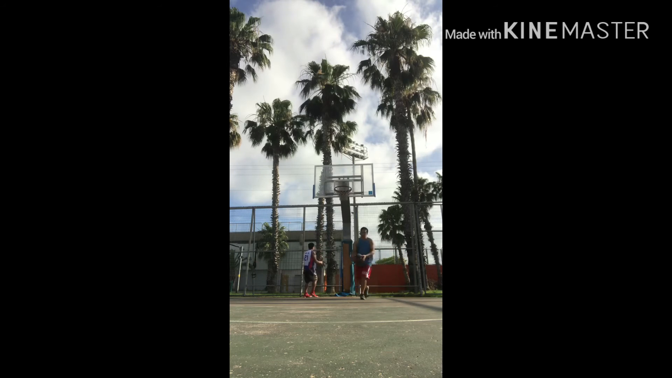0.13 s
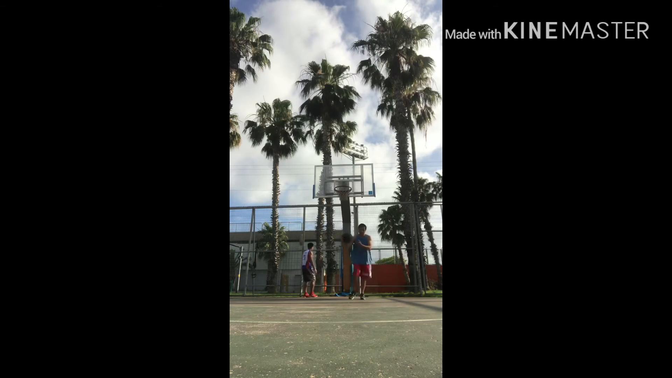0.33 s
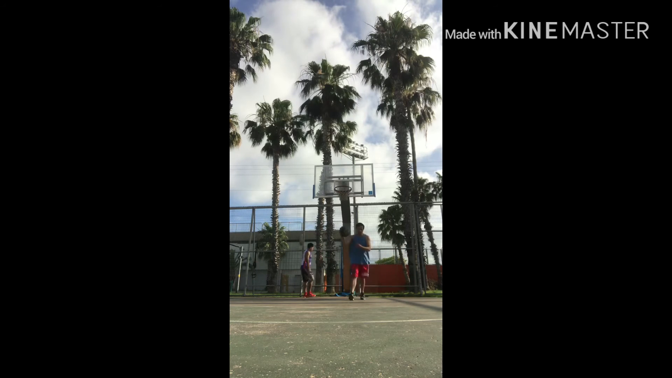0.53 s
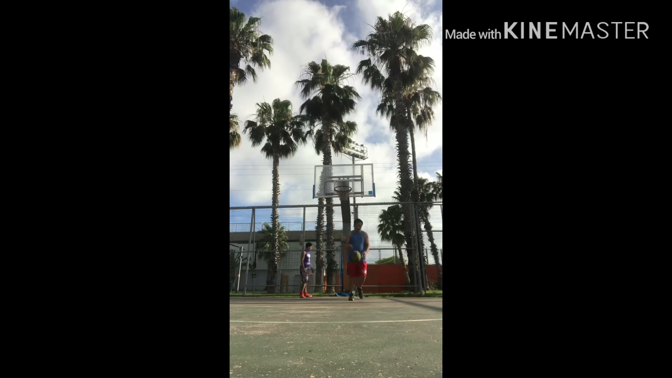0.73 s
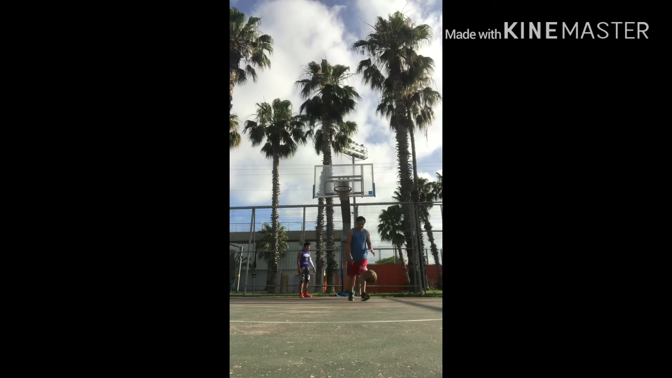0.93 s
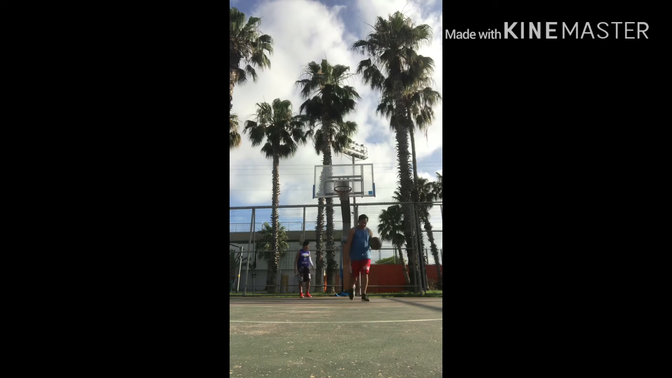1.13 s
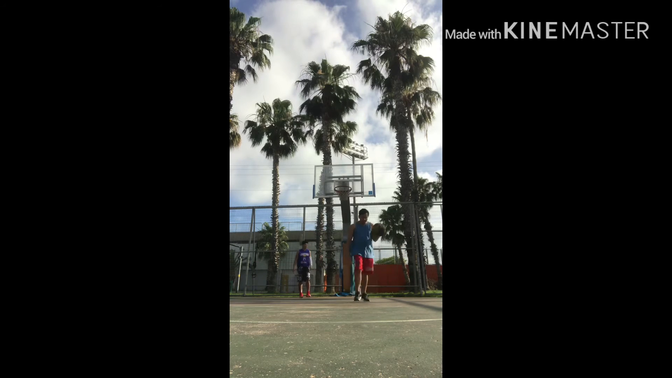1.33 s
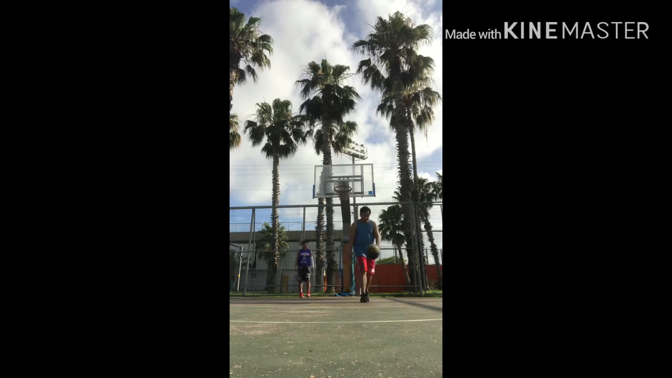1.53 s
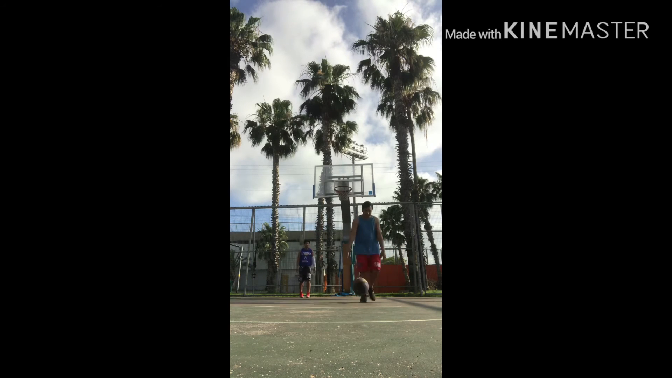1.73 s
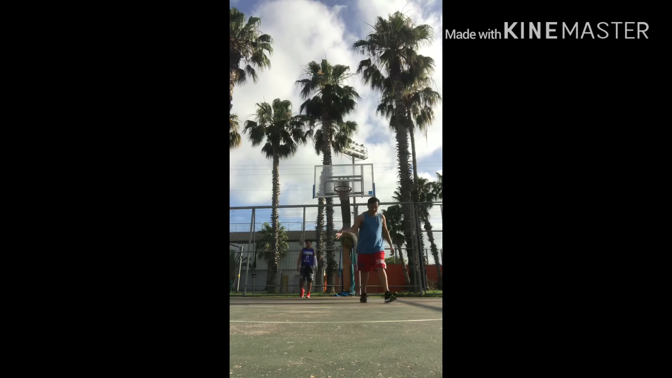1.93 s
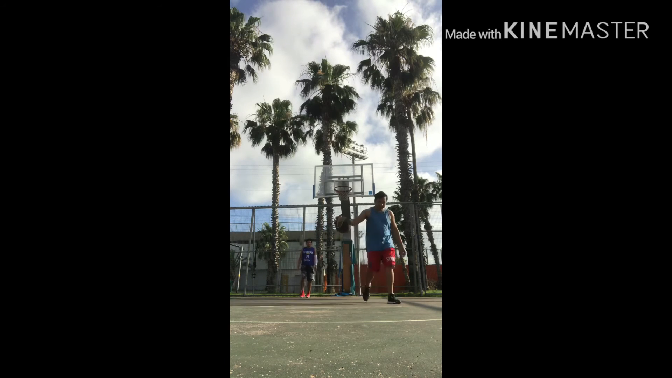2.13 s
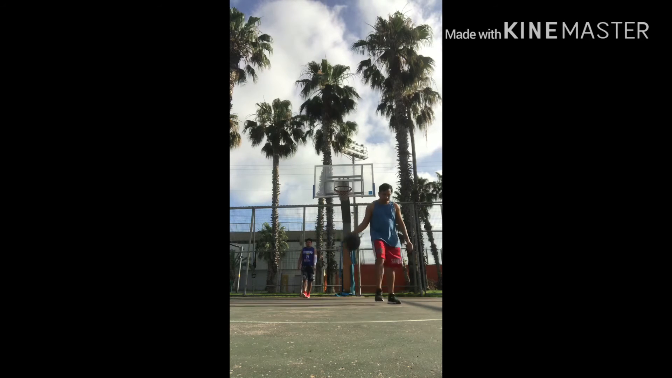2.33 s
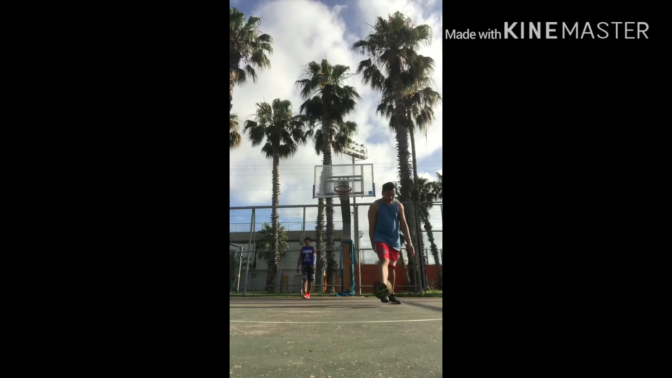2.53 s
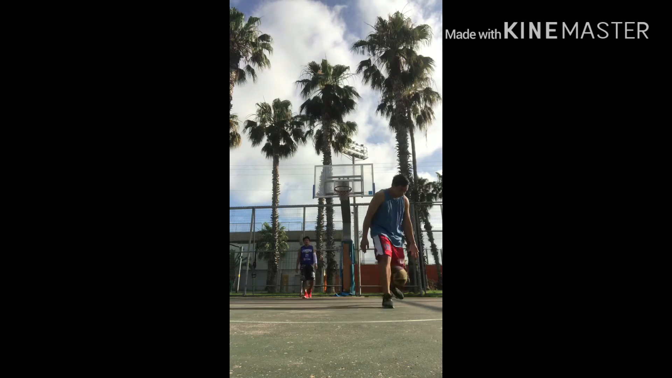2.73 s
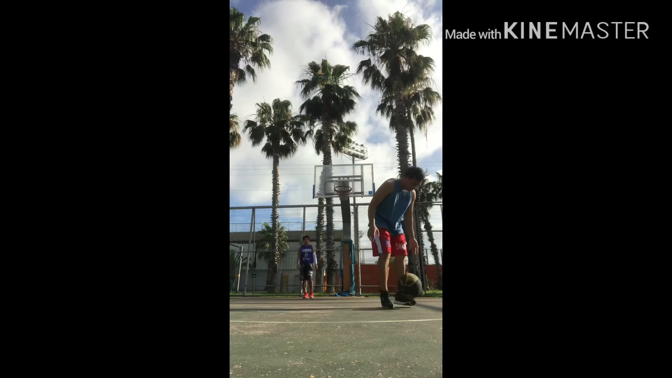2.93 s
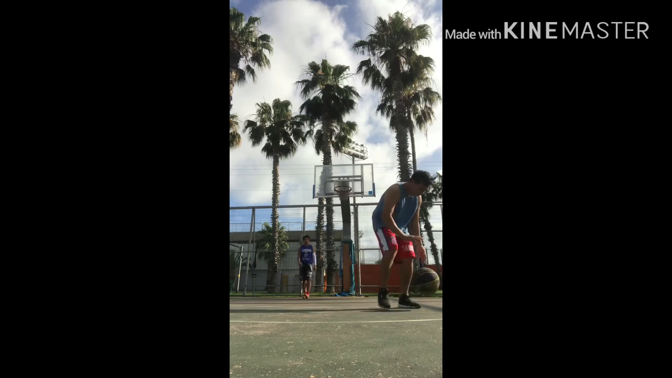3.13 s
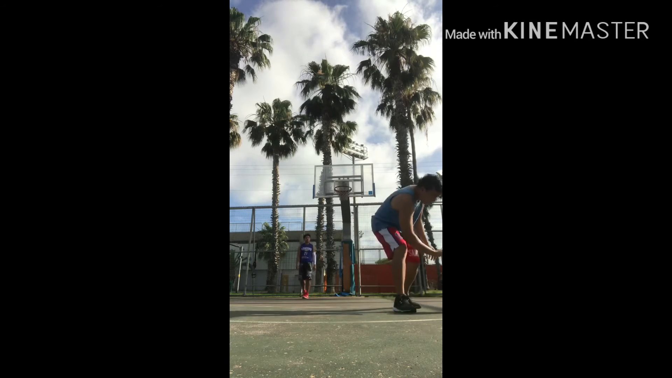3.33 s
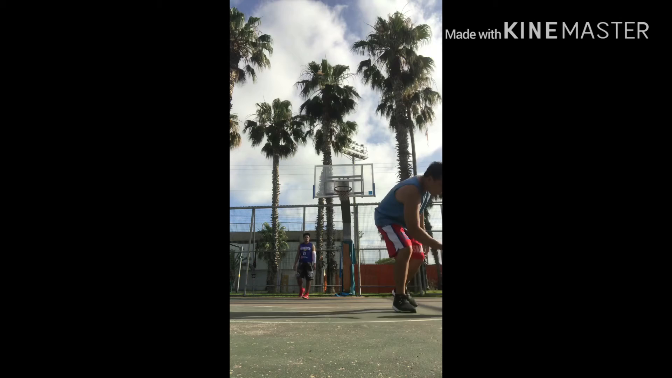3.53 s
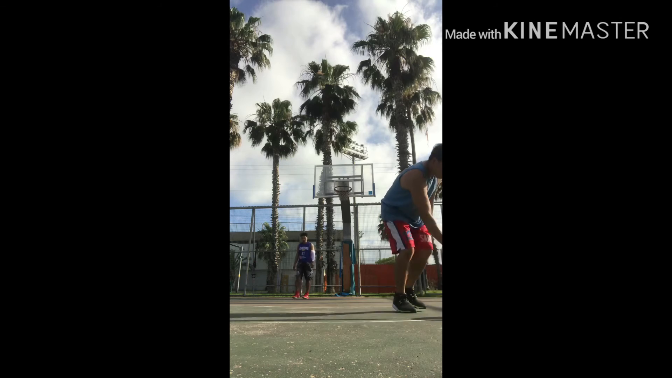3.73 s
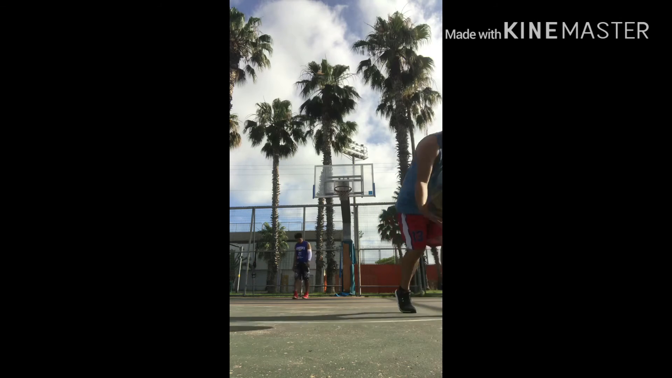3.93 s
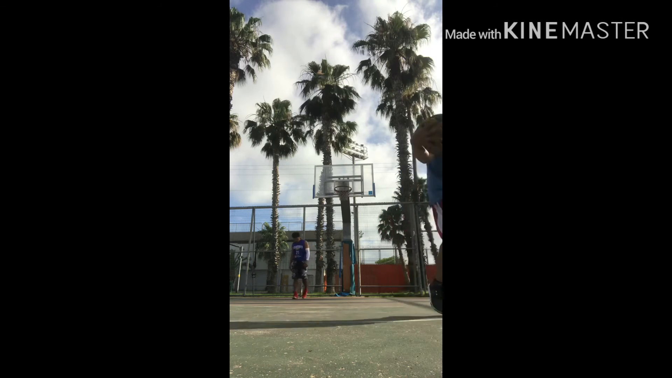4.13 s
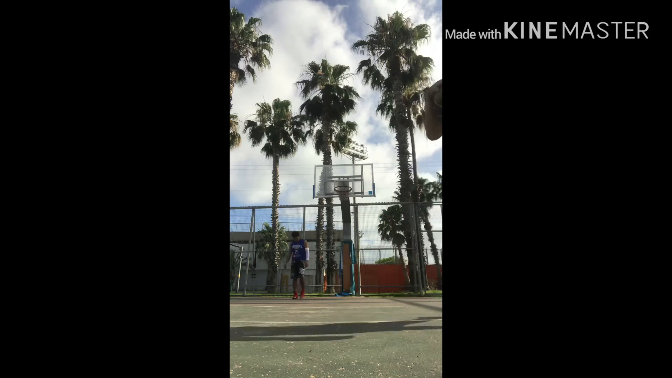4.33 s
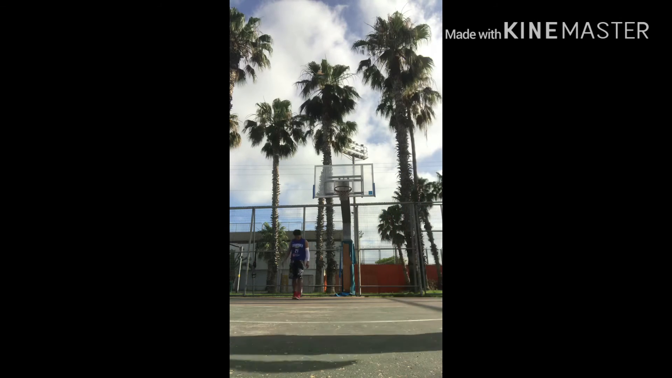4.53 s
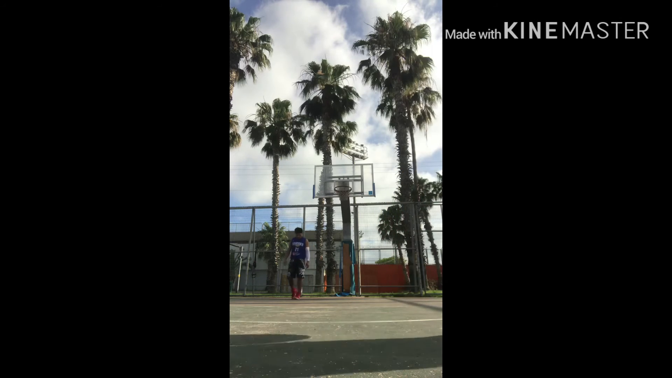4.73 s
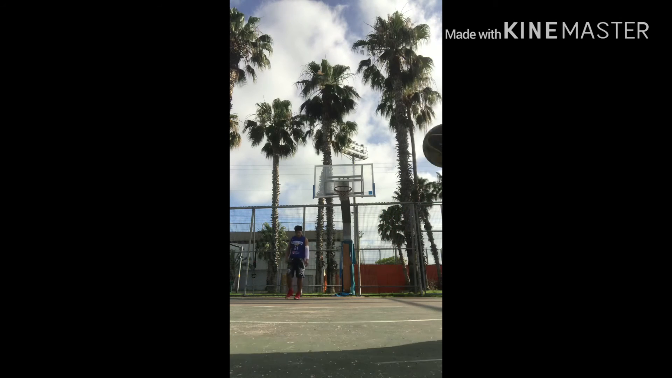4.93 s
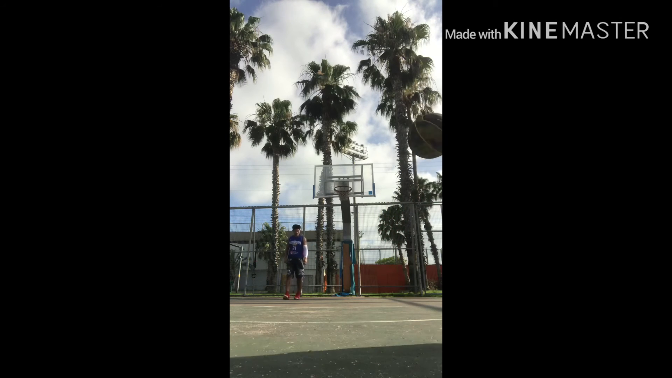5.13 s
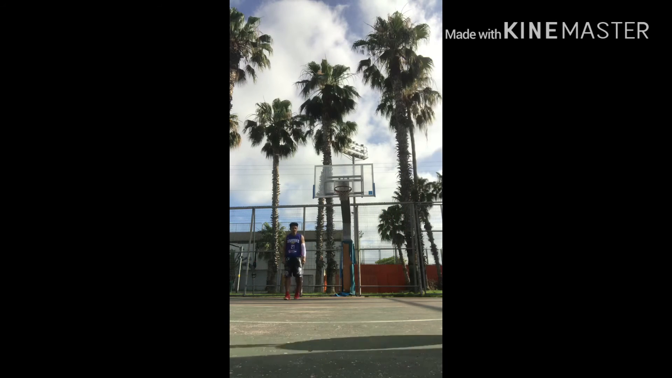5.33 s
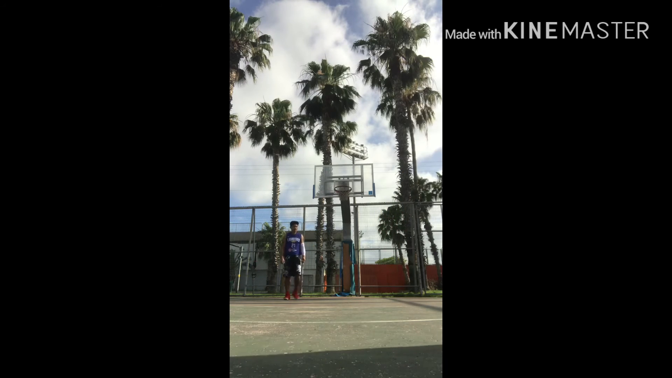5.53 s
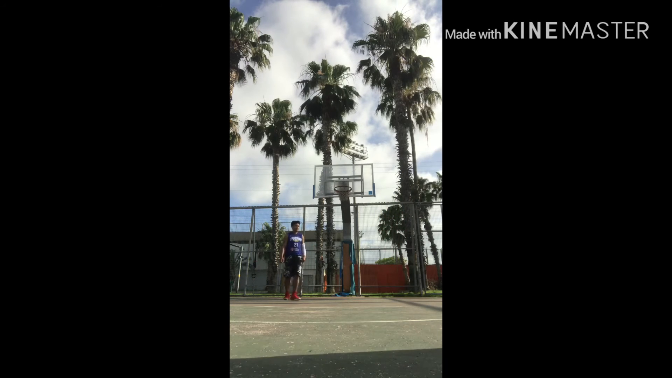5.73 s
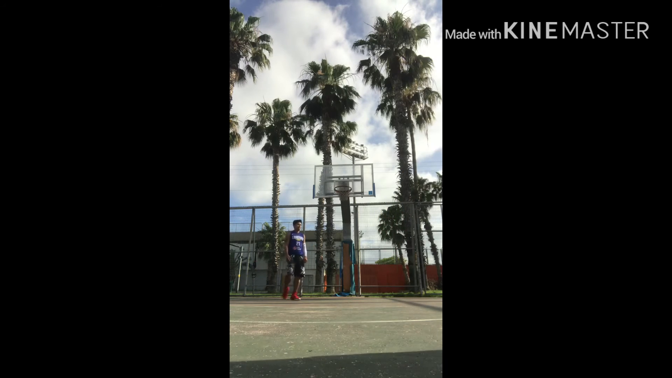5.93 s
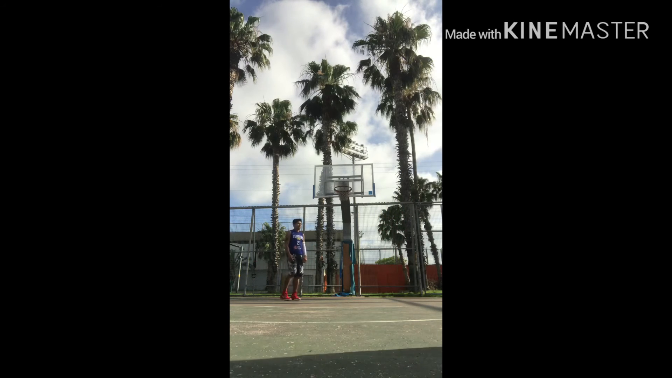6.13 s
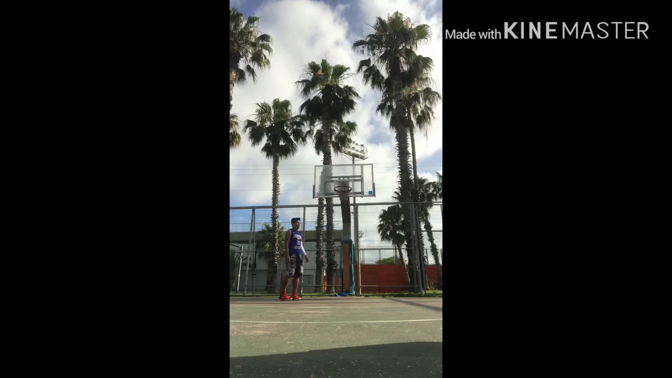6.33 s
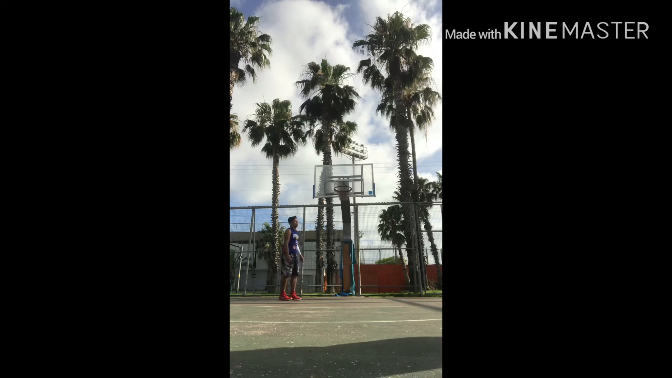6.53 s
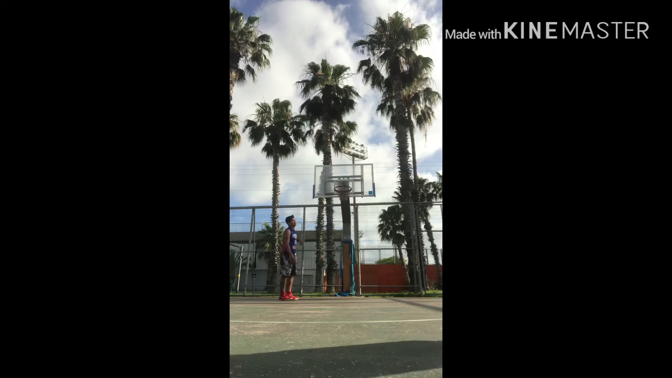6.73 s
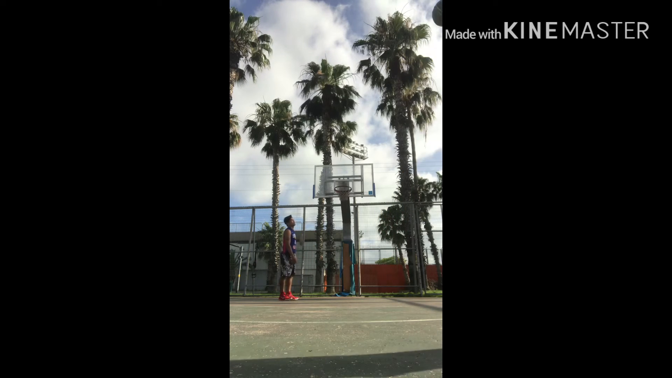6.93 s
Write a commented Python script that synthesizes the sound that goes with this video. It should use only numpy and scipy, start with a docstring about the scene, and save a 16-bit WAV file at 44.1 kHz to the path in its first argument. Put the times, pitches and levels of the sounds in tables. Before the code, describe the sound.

Seven irregular, snappy basketball thumps on concrete, the last ones loudest, mix with soft pats, scuffing shoes and distant traffic hush.

```python
"""A basketball is dribbled towards the listener on an outdoor concrete court.
A steady hush of distant traffic and palm leaves lies behind from the start. After one light pat,
the ball bounces three times, each impact a rubber snap that disperses down into a thump.
Hands pat and shoes scuff around a soft fourth bounce; three louder bounces follow.
Last come a light pat and faint slides of a sole over grit."""
import sys
import numpy as np
from scipy import signal
from scipy.fft import rfft, irfft
from scipy.io import wavfile
from scipy.ndimage import uniform_filter1d

SR = 44100
rng = np.random.default_rng(int(sys.argv[2]) if len(sys.argv) > 2 else 0)


def file_out(sig):
    """Save sig as 16-bit WAV at sys.argv[1]."""
    # one column per channel
    cols = np.atleast_2d(sig).T
    # limit, then scale
    lim = np.clip(cols, -1, 1)
    pcm = np.round(lim * 32767).astype(np.int16)
    wavfile.write(sys.argv[1], SR, pcm)


N = 308700
SIZE = 2 ** 14  # samples in one event
HZ = np.fft.rfftfreq(SIZE, 1 / SR)
T = np.arange(SIZE) / SR

# spectrum of the ball meeting concrete: frequency_hz, level_db
IMPACT_SPECTRUM = [(25, 0), (50, 33), (80, 42), (125, 33.5), (190, 29.5), (300, 21), (600, 20.5),
                   (1060, 17.5), (1240, 6), (1620, 13.5), (2450, 15), (3100, -1), (6800, 4), (9500, -5),
                   (16000, -27)]
# bands that the shell delays, smearing the snap into a thump: centre_hz, quality_factor
SHELL_DELAYS = [(72, .8), (456, .9), (880, 15), (1090, 5), (1650, 1.7)]
# modes of the shell and the enclosed air: pitch_hz, level_db, t60_s
BALL_MODES = [(362, -34, 0.075), (550, -46, 0.081), (972, -43, 0.31), (1040, -46, 0.27), (1545, -36, 0.1),
              (1780, -66, .09), (2170, -50, 0.11)]
# the ball landing: start_s, level_db, snap_db, flex_hz, body_db, rebound_gain, pitch_ratio
BOUNCES = [(1.0732, -8.5, -9.3, 650, 2.5, -.1, .99), (1.8773, -7.5, -11.5, 545, 4, -.25, 1),
           (2.6965, -11.8, -1, 455, -1, .1, .94), (3.6086, -15.8, -18, 390, -6, .5, .88),
           (3.8814, -4, -7, 510, -5, .4, .96), (4.7771, .8, -.6, 665, -1, -.1, .99),
           (5.465, .8, -7.8, 505, 7, -.7, .89)]
def bounce(level_db, snap_db, flex_hz, body_db, rebound, pitch_ratio):
    """Impact excitation: the ball flattens and lifts off; its shell and air ring in damped modes."""
    contact_s = .0138 - .00007 * level_db  # a harder bounce leaves the ground sooner
    flex_db = 3.3 + 6 * abs(rebound)  # a shell that rebounds strongly also flexes more
    slap_db = .5 - .38 * level_db + .35 * snap_db  # the skin's slap stands out in soft bounces
    knock_hz = HZ / (1 + (pitch_ratio - 1) * above(620))
    colour_db = curve(IMPACT_SPECTRUM, knock_hz) + slap_db * hump(1820, .4)
    colour_db += snap_db * above(3950, order=8)
    blow = causal(colour_db + flex_db * hump(flex_hz, .19) + body_db * hump(214, .13))
    # dispersion: the treble snap leaves first, then the thump and a brief ring near 880 Hz
    for hz, q in SHELL_DELAYS:
        resonance = 1 - (HZ / hz) ** 2 + 1j * HZ / (hz * q)
        blow *= np.conj(resonance) / resonance
    # interference: a mid-range wave comes back round the shell and hollows the knock
    round_trip = causal(-20 * below(200) - 14 * above(1250)) * delay(.0043)
    blow *= 1 + rebound * round_trip
    # lift-off is a duller blow of opposite sign
    lift = amp(-11) * causal(2.2 * above(980, order=2) - 26 * above(2800, order=6)) * delay(contact_s)
    # weaker waves keep running round the shell for a few milliseconds
    ripples = rng.standard_normal(SIZE) * (1 - np.exp(-T / .0034)) * np.exp(-T / .0078)
    ripple_db = -30 * below(230) - 4 * above(1450) - 15 * above(4300)
    ripples = amp(-11) * unit_spectrum(ripples) * causal(ripple_db)
    ring = sum(amp(db - 60 * T / t60) * np.sin(2 * np.pi * hz * T) for hz, db, t60 in BALL_MODES)
    # grit crunches as the contact patch spreads
    grains = rng.standard_normal(SIZE) * T * np.exp(-T / .0009)
    crunch_db = -25 * below(2500) - 20 * above(10400, order=8)
    crunch = amp(snap_db - 9.5) * unit_spectrum(grains) * causal(crunch_db)
    return amp(level_db) * (waveform(crunch - blow * (1 - lift + ripples)) + ring)


# hands and feet landing: start_s, level_db, pitch_hz, second_contact_db
PATS = [(.0995, .5, 540, -3), (2.8045, 3, 230, -6), (3.0318, 24, 175, -16), (3.388, 3, 180, -3),
        (3.5573, 15.5, 393, -8), (3.7915, 7, 377, 3), (4.895, 6, 320, -8), (5.253, -4, 350, -9),
        (5.699, -2, 360, 0)]
def pat(level_db, pitch_hz, second_contact_db, gap_s=.006):
    """Heavily damped resonance: two soft contacts in quick succession, each a knock with a tick."""
    detuning = 1.05 * (HZ / pitch_hz - pitch_hz / (HZ + 1))
    knock = below(1.9 * pitch_hz) / np.sqrt(1 + detuning ** 2)
    tick = amp(-23 - .35 * level_db) * above(600, order=2) * below(3200)  # a heavier pat is duller
    # skin or sole keeps settling for a moment after it lands
    settling = rng.standard_normal(SIZE) * np.exp(-T / .0045)
    contacts = 1 + amp(second_contact_db) * delay(gap_s) + amp(-1.5) * unit_spectrum(settling)
    colour = causal(20 * np.log10(knock + tick + 1e-6))
    return amp(level_db) * waveform(colour * contacts)


# spectrum of grit under a sole: frequency_hz, level_db
GRIT_SPECTRUM = [(60, -26), (300, -9), (700, -3), (1100, 0), (2400, 0), (3500, -13), (6500, -14),
                 (9000, -19), (11000, -30), (16000, -42)]
# soles rubbing on grit: start_s, level_db, decay_s
SCUFFS = [(2.606, -50, .008), (2.800, -44, .007), (3.025, -30.5, .0035), (3.3802, -36, .01),
          (4.06, -60, .04), (5.775, -60.5, .04), (6.28, -61, .04)]
def scuff(level_db, decay_s):
    """Friction noise from grit: a short stamp is abrupt and dull, a long slide swells and hisses."""
    rise_s = decay_s ** 2 / .06
    treble_db = 11 - 35 * .0035 / decay_s
    grains = unit_rms(rng.standard_normal(SIZE) * amp(2.5 * rng.standard_normal(SIZE)))
    stroke = np.minimum(T / rise_s, 1) * np.exp(-np.maximum(T - rise_s, 0) / decay_s)
    grit_db = curve(GRIT_SPECTRUM, HZ)
    colour = causal(grit_db + treble_db * above(3600)) / np.sqrt(np.mean(amp(grit_db) ** 2))
    return amp(level_db) * waveform(rfft(grains * stroke) * colour)


# reverberation time of the court: frequency_hz, t60_s
COURT_DECAY = [(80, 0.1), (500, 0.38), (2000, 0.096), (8000, 0.038)]
def court_reverberation(sound):
    """Scattering: fences, trunks and low walls return a diffuse, exponentially decaying tail."""
    scatter = rng.standard_normal(SIZE) * np.minimum(T / .012, 1)
    hz, t, bands = signal.stft(scatter, SR, nperseg=256)
    tail = signal.istft(bands * amp(-60 * t / curve(COURT_DECAY, hz)[:, None]), SR)[1]
    return signal.fftconvolve(sound, tail / np.linalg.norm(tail))[:N]


# spectral density of far traffic and leaves: frequency_hz, relative_level_db
HUSH_SPECTRUM = [(15, -42), (25, -11), (38, -3), (53, 0), (66, -2), (85, -7), (110, -7.5), (223, -14),
                 (326, -18), (430, -16.5), (570, -13.5), (734, -20.5), (950, -19.5), (1230, -21.5),
                 (1610, -23), (2450, -16.5), (3300, -27), (4300, -28.7), (4870, -34), (6210, -40),
                 (10700, -52.5), (16000, -60.5)]
def traffic_and_leaves(level_db=-43, patchy_db=1.18, gust_db=1.36, swell_db=.15):
    """Incoherent sources sum to smooth noise; slow modulation makes its low rumble come and go."""
    frames, hz = N // 512 + 6, np.fft.rfftfreq(2048, 1 / SR)
    real, imag, patches = rng.standard_normal((3, frames, len(hz)))
    patches = uniform_filter1d(patches, size=10, axis=0)
    patches = unit_rms(uniform_filter1d(patches, size=5, axis=1))
    gust, swell = (unit_rms(uniform_filter1d(v, 16))[:, None] for v in rng.standard_normal((2, frames)))
    rumble_db = gust_db * gust / (1 + (hz / 250) ** 2)
    field_db = curve(HUSH_SPECTRUM, hz) + patchy_db * patches + rumble_db + swell_db * swell
    noise = signal.istft(((real + 1j * imag) * amp(field_db)).T, nperseg=2048, noverlap=1536)[1]
    noise = signal.sosfilt(signal.butter(4, 39, "high", fs=SR, output="sos"), noise)
    return amp(level_db) * unit_rms(noise[:N])


def amp(db):
    """Decibels to amplitude ratio."""
    return 10 ** (np.asarray(db) / 20)


def unit_rms(x):
    """Normalisation to rms 1."""
    return x / np.sqrt(np.mean(x ** 2) + 1e-20)


def unit_spectrum(burst):
    """Fourier transform of a burst scaled to unit energy."""
    return rfft(burst / np.linalg.norm(burst))


def curve(points, hz):
    """Interpolation of a table on a log-frequency axis."""
    frequencies, values = np.transpose(points)
    return np.interp(np.log(hz + 1), np.log(frequencies + 1), values)


def hump(hz, octaves):
    """A Gaussian of height 1 on the log-frequency axis."""
    return np.exp(-.5 * (np.log2((HZ + 1) / hz) / octaves) ** 2)


def below(hz, order=4):
    """A low-pass step from 1 to 0 at hz."""
    return 1 / (1 + (HZ / hz) ** order)


def above(hz, order=4):
    """A high-pass step from 0 to 1 at hz."""
    return 1 - below(hz, order)


def causal(db):
    """Minimum phase: the response with this gain curve that rings only after it is struck."""
    log_gain = np.log(amp(np.maximum(db, -100)))
    mirrored = np.r_[log_gain, log_gain[-2:0:-1]]
    return np.exp(np.conj(signal.hilbert(mirrored)))[:len(db)]


def delay(seconds):
    """The linear phase of a pure delay."""
    return np.exp(-2j * np.pi * HZ * seconds)


def waveform(spectrum):
    """Inverse Fourier transform, faded to silence at its end."""
    return irfft(spectrum) * np.clip(4 * (1 - T / T[-1]) - 1, 0, 1)


def scene():
    """Superposition of ball, hands and shoes, their faint reverberation and the background hush."""
    play = np.zeros(N)
    for source, events in ((bounce, BOUNCES), (pat, PATS), (scuff, SCUFFS)):
        for start_s, *settings in events:
            span = play[round(start_s * SR):][:SIZE]
            span += source(*settings)[:len(span)]
    return (play + amp(-33) * court_reverberation(play) + traffic_and_leaves())[None]


# dips in the response of the microphone port: centre_hz, width_hz, gain_db
PORT_DIPS = [(2480, 310, -0.5), (4600, 900, -5.5), (6700, 340, -0.5), (7660, 420, -3.5), (9000, 700, -0.5),
             (10460, 300, -5.5)]
def record(dry, cutoff_hz=15850):
    """Linear filtering: the microphone port notches the treble, then a low-pass limits the band."""
    port_db = sum(db * np.exp(-.5 * ((HZ - hz) / width) ** 2) for hz, width, db in PORT_DIPS)
    coloured = signal.oaconvolve(dry, waveform(causal(port_db))[None], axes=1)[:, :N]
    low_pass = signal.firwin(511, cutoff_hz, window=("kaiser", 9), fs=SR)
    return signal.oaconvolve(coloured, low_pass[None], "same")


dry = scene()
out = record(dry)
file_out(out)
```